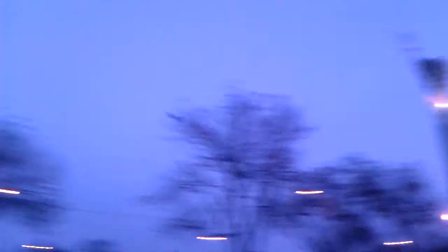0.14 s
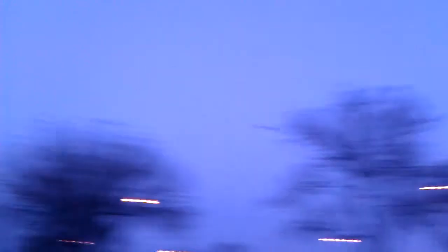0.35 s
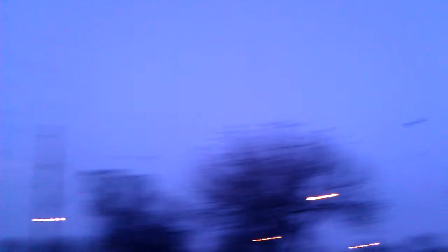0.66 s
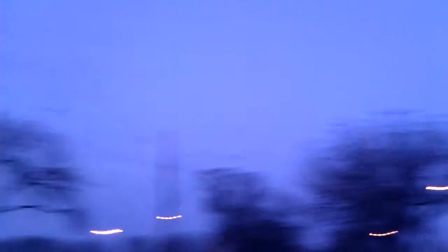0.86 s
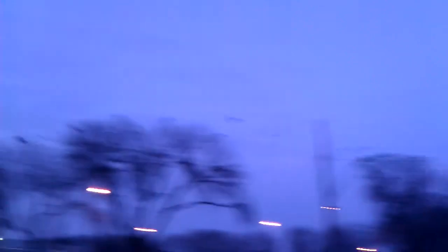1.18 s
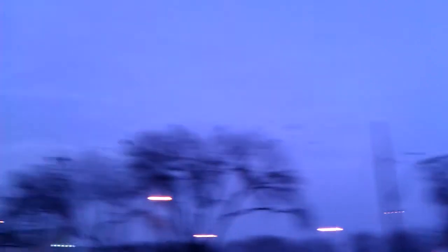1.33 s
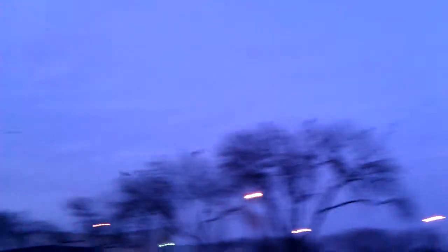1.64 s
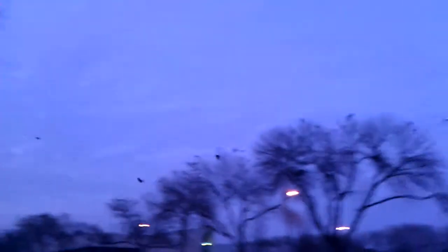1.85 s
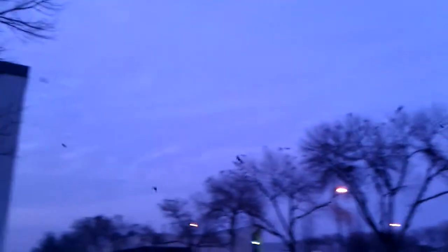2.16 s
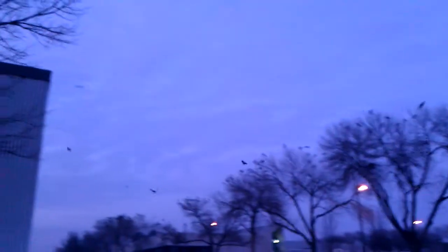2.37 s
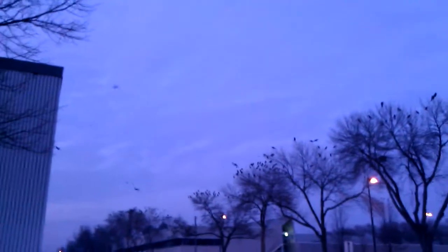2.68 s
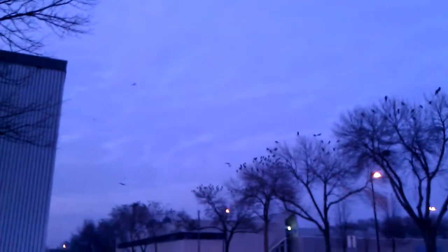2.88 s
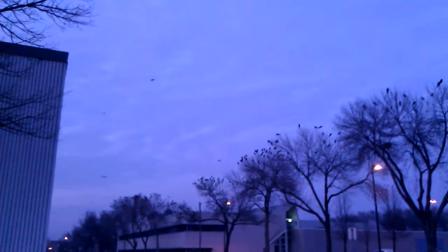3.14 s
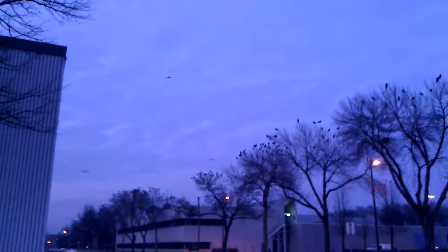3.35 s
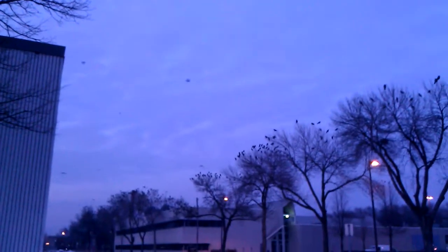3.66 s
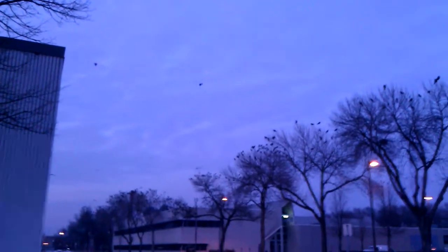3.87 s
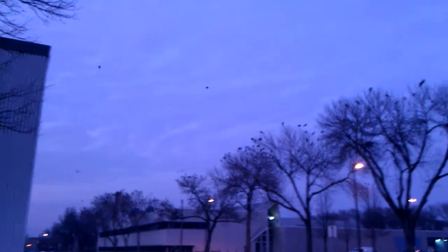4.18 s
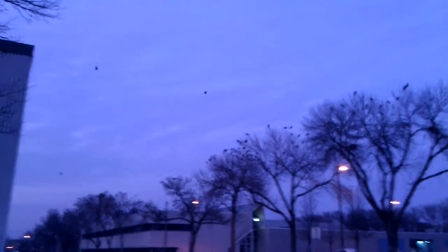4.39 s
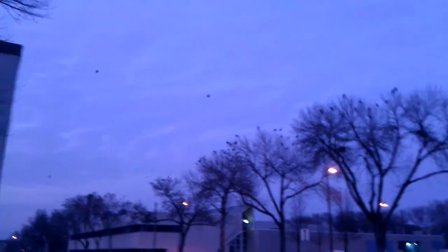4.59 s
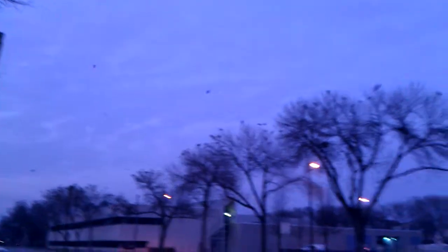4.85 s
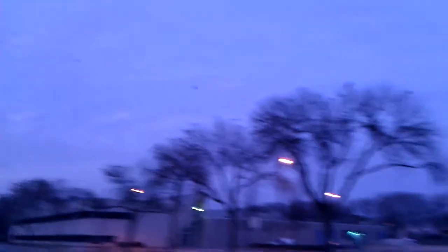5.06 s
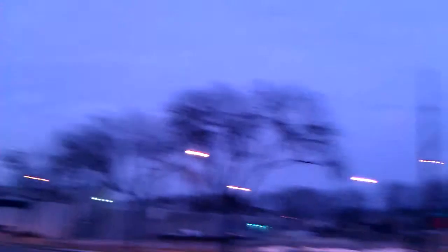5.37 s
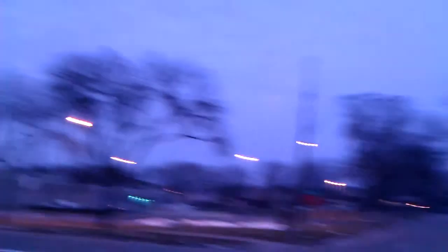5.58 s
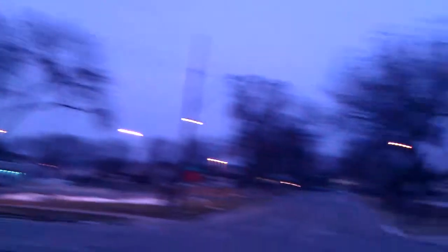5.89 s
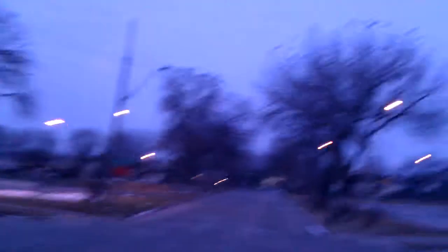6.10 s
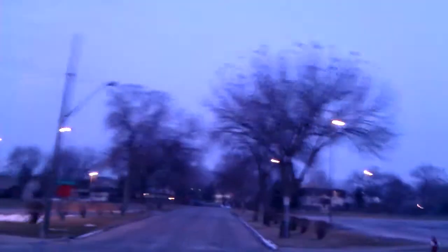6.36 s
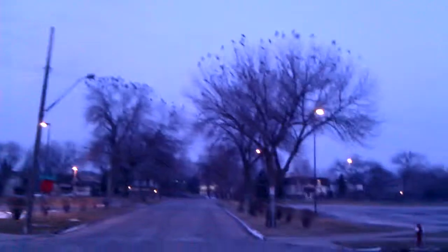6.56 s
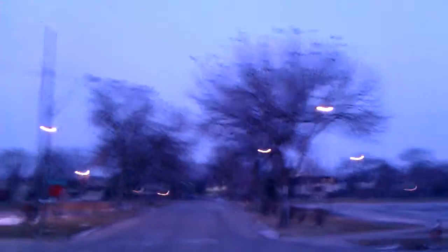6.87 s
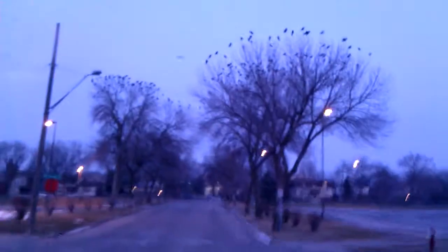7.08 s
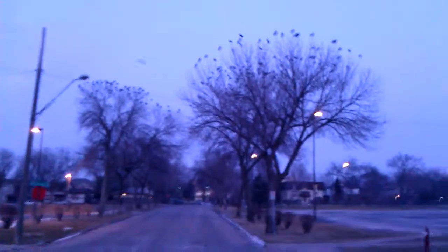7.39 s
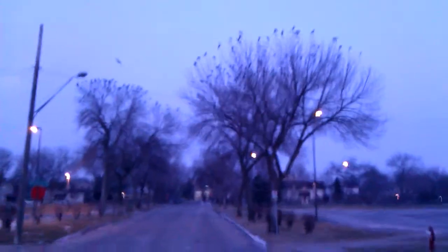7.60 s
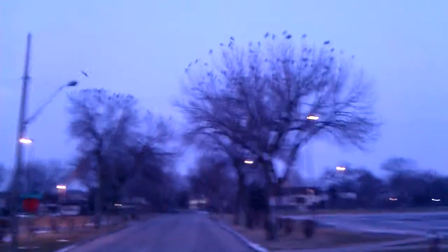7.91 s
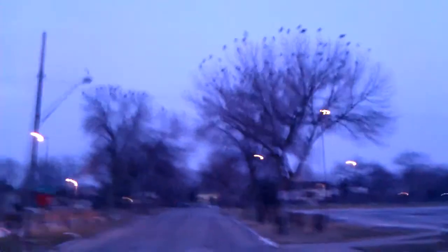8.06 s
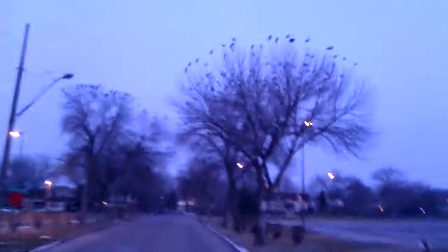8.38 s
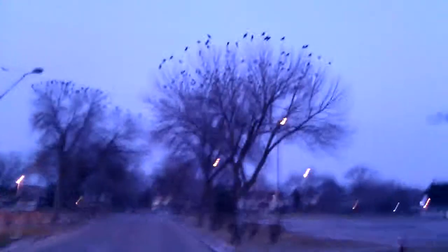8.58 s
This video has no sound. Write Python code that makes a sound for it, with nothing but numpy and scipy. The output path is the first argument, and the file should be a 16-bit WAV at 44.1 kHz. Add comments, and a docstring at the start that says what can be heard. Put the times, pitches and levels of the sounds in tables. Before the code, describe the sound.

A mono, slightly dull hand-held pickup outdoors beside a street at dusk, about 8.7 seconds. From the start, a large crow flock caws loudly: short, hoarse, arched calls of about a tenth of a second, overlapping several per second, over a blurred din of far birds, with short echoes from walls and trunks. Sharp knocks on the camera land near 0.4 and 1.8 s, with softer thuds between. From about 1.5 to 5 s the cawing is quieter and steadier, with thin high sagging whistles hidden in it. Hard knocks return at 5.3 and 5.6 s as near calls briefly thin out. After 6 s caws come in uneven clusters amid grip rumble, finger rustle, plastic creaks and ticks, with a sharp knock near 6.9 s and crackling slips around 8.2 s. Nearby caws strengthen again toward the end. A soft low traffic wash and air hiss continue throughout.

```python
"""Crow roost over a street at dusk

A big flock of crows gathers in bare trees. The nearest birds caw over one another: stacks of jittering
harmonics with air rush, rasp and rattle. Farther off, scores of caws blur into the din of the roost.
Walls, ground and trunks echo the calls; thin sagging tones whistle; shaped noise is the distant traffic.
Close to the microphone, the hand-held camera knocks, rumbles, rustles and creaks: pushes ring its modes."""
import sys
import numpy as np
from scipy import signal
from scipy.fft import rfft, irfft, next_fast_len
from scipy.io import wavfile
from scipy.ndimage import uniform_filter1d

SR = 44100
rng = np.random.default_rng(int(sys.argv[2]) if len(sys.argv) > 2 else 0)


def to_wav(s):
    """Save 16-bit WAV."""
    ch = np.atleast_2d(s).T  # columns
    pcm = np.round(np.clip(ch, -1, 1) * 32767)  # PCM
    wavfile.write(sys.argv[1], SR, pcm.astype(np.int16))


N = 385434  # length in samples

# near birds: gain, and their echoes against the direct sound
CAW_DB, CAW_WET_DB = 2.5, -9
# of a fully rough caw: pitch wander and air rush as shares of pitch and tone; lines between the harmonics
JITTER, NOISE_SHARE, HALF_LINES = 0.038, 0.71, 0.45
# the region that a wide-open beak brightens: centre, and width as a share of it
OPEN_HZ, OPEN_WIDTH = 2150, 0.36
HOARSE_HZ = 1900  # overtones above this break up into a rattle
STREET_T60_S = 0.61

ROOST_DB = -8  # gain on the far din's own level
# the roost answers the near birds: level against theirs, and the time over which it swells and sinks
ANSWER_DB, ANSWER_S = -13, 0.16
# the din's overtones: their level when the din is at the reference, share of its swing in dB they follow
OVERTONE_DB, DIN_REFERENCE_DB, OVERTONE_FOLLOWS = -57.5, -45, 1

# gains on the handling tables and on the traffic
KNOCK_DB, SLIP_DB, RUMBLE_DB, RUSTLE_DB, TOWN_DB = 0.5, -1, -3.5, -2, 1
# the grip holds the case still below this pitch: firm at first, slack once the camera has been swung round
FIRM_HZ, SLACK_HZ, SLACK_FROM_S = 304, 193, 6.19
# a contact harder than NAIL_HZ is a fingernail, too brief to rock the case even in a slack grip;
# NAIL_DB sets its sharp click against the peak in the table of knocks
NAIL_HZ, NAIL_DB = 3800, -8.5
# light bumps of the palm: rate, peak above the rumble table, spread, hardness
BUMPS_PER_S, BUMP_DB, BUMP_SPREAD_DB, BUMP_HARDNESS_HZ = 3.9, 9.5, 3.5, 220
# faint slips while the fingers rustle: rate, peak above the rustle table, spread
FAINT_SLIPS_PER_S, FAINT_SLIP_DB, FAINT_SPREAD_DB = 6.3, 8.5, 2
SLIP_S = 0.0021  # time constant of a slip's burst
DRAG_RUSTLE_DB = -19  # rustle of a dragging palm against its rumble
CUTOFF_HZ = 8300  # top of the recorder's band

# modes of the camera's case [f/Hz, level/dB, t60/s]
CASE_MODES = [(221, -22, 0.012), (315, -8.5, 0.025), (480, -11, 0.018), (782, 5, 0.0091), (1010, 4, 0.0027),
              (3200, -6, 0.00092)]
# what slipping fingers ring with [f/Hz, level/dB, t60/s]
SLIP_RINGING = [(1920, 4.5, 0.0076), (2710, 12.5, 0.0028), (3510, 6, 0.0062), (4670, -27.5, 0.0024),
                (6960, -4.5, 0.002)]
# rumble of the shifting grip, before its gain [t/s, level/dB]
GRIP_RUMBLE = [(0.0, -54.5), (0.78, -54), (1.14, -56), (1.95, -52.5), (2.36, -56), (5.11, -54.5),
               (5.26, -49.5), (5.74, -53.5), (6.57, -47), (7.74, -48), (7.96, -45.5), (8.74, -49.5)]
# rustle of the fingers in the slack grip, before its gain [t/s, level/dB]
FINGER_RUSTLE = [(6.1, -63), (6.25, -66), (6.6, -62), (7.43, -50), (7.66, -56), (8.01, -53.5),
                 (8.16, -47.5), (8.59, -52), (8.74, -45)]


def near_crows():
    """The birds in the closest trees, each in the voice of the group that leads, with their echoes."""
    # near caws, before their gain [t/s, length/s, top f/Hz, level/dB,
    # share of the length at which the pitch tops, brightness from the open beak/dB]
    calls = [(-.09, 0.14, 751, -40.5, 0.43, 5), (0.06, 0.083, 663, -45.5, .5, -8),
             (0.123, 0.1, 712, -41.5, 0.35, -2.5), (0.199, .12, 633.6, -40.5, 0.46, -3),
             (0.299, 0.12, 701, -37, 0.26, 7.5), (0.306, 0.025, 660, -33, 0.48, -3),
             (0.335, 0.011, 687, -37, 0.36, -3), (0.361, 0.044, 659, -38, 0.25, 0),
             (0.449, 0.11, 635, -39.5, .5, 5.5), (0.486, 0.099, 721, -42, 0.59, 2),
             (0.569, 0.14, 614, -47, 0.49, 0), (0.656, 0.094, 709, -40, .35, 8.5),
             (0.798, 0.19, 706.4, -40.5, 0.2, 5), (.858, 0.12, 670.4, -38.5, 0.21, -8),
             (.98, 0.079, 623, -40, 0.49, 0), (1.003, 0.22, 701, -44, 0.43, 8.5),
             (1.07, 0.086, 628, -38.5, .35, -4), (1.139, .13, 654, -46, 0.34, 9),
             (1.229, 0.12, 698, -46.5, 0.41, -1.5), (1.421, .14, 691, -43.5, 0.37, -2),
             (1.52, 0.13, 623, -44, .45, -2.5), (1.581, 0.12, 688, -43, 0.47, -1),
             (1.633, .045, 664, -42.5, 0.38, -5), (1.66, 0.1, 603, -45, 0.22, 3),
             (1.764, 0.15, 679, -46, .37, 3), (1.947, 0.11, 721, -48.5, .37, -8),
             (2.109, .14, 680, -44, 0.42, -3.5), (2.216, 0.14, 689, -44.5, 0.54, -1),
             (2.335, .14, 658, -45.5, 0.35, -0.5), (2.663, 0.17, 654, -48.5, 0.52, -1),
             (2.726, .14, 696, -43.5, .42, -2), (2.811, 0.16, 628, -45.5, 0.39, 2.5),
             (2.924, .13, 624, -44.5, .3, -1.5), (3.145, 0.098, 716, -47.5, 0.41, 2.5),
             (3.234, .11, 756, -47, .47, -3), (3.292, .07, 654, -49.5, 0.33, 1),
             (3.43, 0.028, 634, -41, 0.72, -9), (3.46, 0.14, 650, -43.5, 0.18, -4),
             (3.499, 0.15, 604, -51.5, .25, 4), (3.675, 0.13, 763, -45, 0.48, -5),
             (3.753, 0.078, 658, -52, 0.38, 3), (3.84, 0.16, 756, -50, 0.44, 8),
             (3.882, .11, 655, -53.5, 0.34, 3), (4.025, 0.1, 737, -47.5, 0.27, 1),
             (4.102, 0.16, 642, -51, 0.24, -1), (4.14, .11, 736, -54, .4, 1),
             (4.242, 0.14, 756, -45.5, .42, -0.5), (4.282, 0.1, 667, -51.5, .35, 0),
             (4.485, 0.14, 758, -47, 0.44, -3), (4.556, .13, 672, -47.5, 0.37, 1),
             (4.608, 0.11, 752, -49, 0.38, -7), (4.733, 0.12, 764, -49, 0.39, 3.5),
             (4.788, .12, 661, -53.5, 0.32, 1), (4.9, 0.12, 768, -49, .45, 0),
             (5.005, .12, 765, -48, 0.44, 0), (5.029, .11, 683, -51, .45, -4),
             (5.218, .14, 768, -47, 0.41, -3), (5.314, 0.083, 670, -48, 0.31, 4),
             (5.772, .14, 689, -53.5, .37, 8.5), (5.809, .14, 643, -57.5, 0.31, 12),
             (6.072, 0.14, 702, -50.5, .5, 1), (6.139, .12, 686, -45.5, 0.41, 9),
             (6.178, 0.17, 644, -46.5, 0.48, 4.5), (6.247, 0.13, 709, -46.5, 0.34, -0.5),
             (6.289, 0.13, 631, -49.5, 0.27, 6), (6.34, 0.15, 590, -52, 0.22, 5),
             (6.4, 0.12, 701, -53.5, .4, 7), (6.6, .14, 644, -50, 0.36, 1),
             (6.591, 0.11, 719, -47.5, 0.41, 9.5), (6.68, 0.11, 590, -61, 0.46, 8),
             (6.728, 0.17, 713, -50, .3, 1), (7.142, 0.16, 631, -52.5, 0.49, -1),
             (7.19, 0.092, 726, -45, 0.49, 5), (7.249, 0.14, 750, -47.5, 0.4, -3),
             (7.27, 0.11, 623, -49, 0.38, 12), (7.51, 0.12, 604, -46.5, 0.37, 1),
             (7.653, 0.1, 647, -50, 0.44, 6), (7.772, 0.15, 685.4, -44.5, 0.36, 2.5),
             (7.86, 0.095, 597, -45, 0.31, -8), (8.143, 0.14, 696, -47.5, 0.46, 5),
             (8.166, 0.097, 626, -40.5, 0.45, -9), (8.25, .1, 612.5, -42, .35, 3.5),
             (8.325, 0.14, 592, -52, 0.31, 16), (8.532, .19, 686, -46.5, 0.38, 8),
             (8.568, 0.056, 652, -43.5, 0.46, 1), (8.652, .12, 634.5, -44.5, 0.39, 4)]
    # a crow's throat [f/Hz, level/dB]
    throat = [(400, -23), (700, -7.5), (950, -16.5), (1170, 7.5), (1500, 6.5), (1750, -16.5), (2150, -10),
              (2450, -19), (2750, -21), (3150, -23), (3550, -21.5), (4150, -33.5), (4580, -18.5),
              (4850, -31), (5600, -49), (6700, -33.5), (8000, -53)]
    # voices of the groups [from t/s, roughness 0-1, clearness of the overtones 0-1,
    # beak resonance f/Hz, its level/dB, its width as a share of its pitch]
    voices = [(-1, 0.59, 0.83, 3780, 9.5, 0.096), (0.5, .52, .86, 3520, 4, .035),
              (0, .55, .84, 2900, 4, 0.055), (.97, .55, .88, 3200, 10, .03),
              (0.2, 0.5, .8, 2790, 10, 0.052), (2.0, .58, 0.75, 2960, 13, 0.17),
              (4, 0.45, 0.8, 3250, 12, 0.078), (4.5, 0.3, .92, 3730, 14.5, 0.058),
              (5.5, 0.51, 0.7, 2400, 3.5, 0.14), (6.55, 0.34, 0.92, 2080, 6, 0.087),
              (7.5, 0.41, 0.88, 1750, 4, 0.12)]
    out = np.zeros(N)
    for start_s, length_s, top_hz, db, crest, open_db in calls:
        # the last listed voice whose time has come leads
        _, rough, clear, beak_hz, beak_db, width = [voice for voice in voices if voice[0] <= start_s][-1]
        call = caw(length_s, top_hz, rough, clear, crest, throat, beak_hz, beak_db, open_db, beak_width=width)
        add(out, start_s, from_db(db) * call)
    return from_db(CAW_DB) * (out + from_db(CAW_WET_DB) * street(out))


def caw(length_s, top_hz, rough, clear, crest, throat, beak_hz, beak_db, open_db=0,
        rasp_hz=78, rasp_depth=0.62, beak_width=0.2, count=8):
    """An arched stack of jittering harmonics, shaped by throat and beak; the high ones turn hoarse."""
    # the arch of one caw [share of its length, share of its top pitch, loudness 0-1]
    arch = [(0, .74, 0), (.08, .83, .75), (.22, .935, 1), (.34, .987, 1), (.45, 1, 1), (.62, .968, 1),
            (.85, .875, .9), (1, .79, 0)]
    size = int(length_s * SR)
    share, pitch, loudness = np.transpose(arch)
    u = np.linspace(0, 1, size)

    # the beak lifts one region of the overtones; opened wide, it also brightens a second one
    f = np.geomspace(200, 9000, 120)
    beak_lift_db = beak_db * np.exp(-(np.log(f / beak_hz) / beak_width) ** 2)
    open_lift_db = open_db * np.exp(-(np.log(f / OPEN_HZ) / OPEN_WIDTH) ** 4)
    tract_db = 20 * np.log10(gain_at(throat, f)) + beak_lift_db + open_lift_db
    tract = np.transpose([f, tract_db])

    # an early crest makes a falling caw, a late one a rising one
    along = np.interp(u, [0, np.clip(crest, .05, .9), 1], [0, share[pitch.argmax()], 1])
    hz = top_hz * np.interp(along, share, pitch)
    jittered_hz = hz * (1 + JITTER * rough * wobble(size, 697.7))
    phase = 2 * np.pi * np.cumsum(jittered_hz) / SR

    # paths through the branches make each harmonic swell and fade on its own
    def partial(k):
        level = gain_at(tract, k * hz) * from_db(3.3 * wobble(size, 30.9))
        return level * np.sin(k * phase + rng.uniform(0, 2 * np.pi))

    # strong and weak cycles alternate, which puts half lines between the harmonics
    harmonics = [partial(k) + HALF_LINES * rough * partial(k + .5) for k in range(1, count + 1)]
    tone = rms_one(sum(harmonics))
    # air rushes through once a cycle
    once_a_cycle = 1 + np.cos(phase)
    rush = coloured(rng.standard_normal(size) * once_a_cycle, tract)
    # the two sides of the syrinx beat unevenly against each other: the rasp
    beat_hz = rasp_hz * (rng.uniform(0.6994, 1.3) + 0.289 * wobble(size, 89.5))
    rasp = np.exp(rasp_depth * rough * np.sin(2 * np.pi * np.cumsum(beat_hz) / SR))
    # uneven cycles smear part of the high harmonics into a rattle that only throat and beak shape
    rattle = coloured(rng.standard_normal(size) * once_a_cycle * rasp, tract)
    clear = np.clip(clear, 0, 1)
    overtones = clear * tone + np.sqrt(1 - clear ** 2) * rattle
    voice = cut(tone, HOARSE_HZ, "low", order=4) + cut(overtones, HOARSE_HZ, "high", order=4)
    return rms_one((voice + NOISE_SHARE * rough * rush) * rasp) * np.interp(u, share, loudness)


def street(x, first_s=.025, count=280):
    """Scattered echoes from walls, ground and trunks, fading with delay and duller than the direct sound."""
    delays = rng.uniform(first_s, .8, count)
    echoes = np.zeros(SR)
    echoes[(delays * SR).astype(int)] = rng.standard_normal(count) * from_db(-60 * delays / STREET_T60_S)
    unit_energy = echoes / np.linalg.norm(echoes)
    return cut(signal.fftconvolve(x, unit_energy)[:N], 4500, "low")


def roost(near, pitch_hz=675, pitch_spread=.075, rough=0.54, clear=0.66, crest=0.4005,
          beak_hz=2900, beak_db=2, split_hz=1900, count=96):
    """Scores of far caws blur into a din that swells whenever the near birds call."""
    # the din's own level, before its gain [t/s, level/dB]
    own_level = [(0.0, -33), (0.92, -33.5), (1.35, -37.5), (1.7, -42.5), (2.08, -46), (2.2, -41.5),
                 (2.6, -43.5), (2.82, -40.5), (3.6, -41.5), (4.23, -45), (4.44, -58), (4.66, -41),
                 (5.67, -49), (6.28, -44), (6.47, -49.5), (6.86, -40), (7.01, -47), (7.76, -44.5),
                 (7.98, -59), (8.64, -43.5)]
    # far caws after their way through the air [f/Hz, level/dB]
    far_throat = [(400, -31.5), (700, -12.5), (950, -13.5), (1180, 1), (1480, 0), (1670, -2.5), (1850, -17),
                  (2300, -23.5), (3300, -12), (4300, -21.5), (6000, -30.5), (8000, -41)]
    out = np.zeros(N)
    for k in range(count):
        start_s = (k + rng.random() - 2) / (count - 2) * N / SR
        top_hz = pitch_hz * np.exp(pitch_spread * rng.standard_normal())
        length_s, far_beak_hz = rng.uniform(.16, .25), beak_hz * rng.uniform(0.62, 1.0)
        add(out, start_s, caw(length_s, top_hz, rough, clear, crest, far_throat, far_beak_hz, beak_db, count=5))
    din = out + 0.59 * street(out)
    # even out the chance swells, then lay on the level
    din = din / np.sqrt(uniform_filter1d(din ** 2, size=6000) + 1e-9)
    own_db, = in_time(own_level)
    answer_power = uniform_filter1d((from_db(ANSWER_DB) * near) ** 2, size=int(ANSWER_S * SR))
    level_db = 10 * np.log10(from_db(own_db + ROOST_DB) ** 2 + answer_power)
    overtones_db = OVERTONE_DB + OVERTONE_FOLLOWS * (level_db - DIN_REFERENCE_DB)
    body = from_db(level_db) * rms_one(cut(din, split_hz, "low", order=4))
    return body + from_db(overtones_db) * rms_one(cut(din, split_hz, "high", order=4))


def whistles(quaver=0.0093, wet_db=-6):
    """Thin, high, nearly pure notes among the crows that sag in pitch, with their echoes."""
    # whistled notes [t/s, length/s, f/Hz, fall as a share of the pitch, level/dB]
    notes = [(.96, 0.18, 3530, 0.011, -57.5), (3.3, 0.038, 3700, 0.054, -63),
             (3.375, 0.048, 3740, 0.05, -59), (3.74, 0.032, 3730, 0.045, -61),
             (3.826, 0.039, 3750, 0.072, -55.5), (5.238, .2, 3800, .005, -71),
             (5.581, 0.12, 3770, 0.0049, -65), (6.61, 0.15, 3610, .02, -66), (7.07, 0.16, 3710, 0.035, -61),
             (7.182, 0.2, 3680, 0.03, -62)]
    out = np.zeros(N)
    for start_s, length_s, hz, fall, db in notes:
        u = np.linspace(0, 1, int(length_s * SR))
        sagging_hz = hz * (1 - fall * u + quaver * wobble(len(u), 370))
        phase = 2 * np.pi * np.cumsum(sagging_hz) / SR
        add(out, start_s, from_db(db) * np.sqrt(2) * np.sin(np.pi * u) * np.sin(phase))
    return out + from_db(wet_db) * street(out)


def knocks(spot_db=4, detune=0.084):
    """Each knock rings the case a little differently; a soft finger pad leaves only the low thud."""
    # knocks of the hand on the camera, before their gain [t/s, peak level/dB, hardness of the contact f/Hz]
    hits = [(.32, -19.5, 503), (0.423, -9.5, 4950), (.4295, -14, 395), (0.5176, -24, 201),
            (0.5361, -16, 2000), (0.7337, -21, 400), (.9425, -26, 504), (1.465, -26.5, 250),
            (1.7524, -20.5, 394), (1.784, -10.5, 4970), (1.88, -38, 246), (1.923, -36, 250),
            (1.937, -39, 250), (2.065, -36, 200), (2.545, -39, 250), (2.8803, -27.5, 195),
            (2.9596, -24.5, 250), (3.078, -30.5, 350), (3.3125, -26, 249), (3.456, -25, 300),
            (4.164, -31.5, 300), (5.079, -22, 387), (5.128, -27, 2000), (5.144, -27, 2020),
            (5.2815, -27, 199), (5.34, -9.5, 5070), (5.515, -27, 250), (5.64, -10.5, 387),
            (5.9787, -23, 1000), (6.109, -19.5, 400), (6.1805, -24.5, 450), (6.2027, -17, 800),
            (6.406, -29.5, 2000), (6.4568, -31, 500), (6.538, -26.5, 256), (6.7492, -22, 1390),
            (6.7876, -28, 1500), (6.807, -24.5, 250), (6.9355, -12, 4730), (6.995, -25, 5000),
            (7.008, -16, 900), (7.0157, -22, 204), (7.533, -32, 302), (7.612, -34, 250),
            (7.695, -35.5, 250), (8.151, -28, 250), (8.16, -24, 1220), (8.2275, -20.5, 5000),
            (8.2378, -22, 3000), (8.268, -26.5, 500), (8.334, -19, 4500), (8.37, -30, 400),
            (8.461, -32.5, 253), (8.685, -27, 199)]
    # what a fingernail's click rings with [f/Hz, level/dB, t60/s]
    nail_modes = [(2180, -7, 0.0028), (3330, -1, 0.004)]
    out = np.zeros(N)
    bump_times = scattered(GRIP_RUMBLE, BUMPS_PER_S, BUMP_DB, BUMP_SPREAD_DB)
    bumps = [(s, db, BUMP_HARDNESS_HZ) for s, db in bump_times]
    for s, db, hardness_hz in list(hits) + bumps:
        held_hz = SLACK_HZ if s > SLACK_FROM_S and hardness_hz < NAIL_HZ else FIRM_HZ
        modes = [(hz * np.exp(detune * rng.standard_normal()), level + spot_db * rng.standard_normal(), t60)
                 for hz, level, t60 in CASE_MODES]
        push = cut(signal.unit_impulse(SR // 20), hardness_hz, "low")
        knock = cut(ring(push, modes), held_hz, "high", order=3)
        add(out, s, from_db(db + KNOCK_DB) * knock / np.abs(knock).max())
        if hardness_hz > NAIL_HZ:
            click = ring(push, nail_modes)
            add(out, s, from_db(db + NAIL_DB) * click / np.abs(click).max())
    return out


def grip(soft_hz=260, low_hz=130, drag_hz=480):
    """Catches rumble through the palm, harder where it drags, and crackle as the fingers rustle when slack."""
    # the palm drags over the case [t/s, length/s, level/dB]
    palm_drags = [(6.141, 0.036, -37.5), (6.324, 0.09, -46.5), (6.449, 0.04, -44), (6.782, 0.024, -34),
                  (6.96, 0.074, -33), (8.202, 0.19, -51)]
    (rumble_db,), (rustle_db,) = in_time(GRIP_RUMBLE), in_time(FINGER_RUSTLE)
    slack = np.arange(N) / SR > FINGER_RUSTLE[0][0]
    palm = cut(ring(catches(per_s=2200, size_db=3, clump_db=2.5), CASE_MODES), low_hz, "high")
    fingers = rms_one(ring(catches(per_s=1000, size_db=4.5, clump_db=3.0), SLIP_RINGING))
    rumble = from_db(rumble_db + RUMBLE_DB) * rms_one(cut(palm, soft_hz, "low"))
    rustle = slack * from_db(rustle_db + RUSTLE_DB) * fingers
    drag = strokes(palm_drags) * (rms_one(cut(palm, drag_hz, "low")) + from_db(DRAG_RUSTLE_DB) * fingers)
    return rumble + rustle + drag


def rubs(detune=0.098):
    """A fingertip creaks across the plastic in uneven runs of catches, each stroke at a pitch of its own."""
    # strokes of the fingertip [t/s, length/s, level/dB]
    rub_strokes = [(6.084, 0.045, -49), (6.306, 0.017, -47.5), (6.81, 0.069, -50), (6.931, 0.049, -45),
                   (7.351, 0.039, -40.5), (7.483, 0.039, -47.5), (7.531, 0.022, -40.5), (7.937, .04, -51),
                   (8.08, 0.059, -49), (8.165, 0.0165, -54), (8.2, 0.026, -56), (8.409, 0.028, -52),
                   (8.568, 0.094, -46.5), (8.691, 0.021, -33.5)]
    # what a rub rings with [f/Hz, level/dB, t60/s]
    rub_modes = [(1750, 0.5, .003), (2690, 25.5, 0.0097), (3000, 3.5, .005), (3750, -8, 0.0043),
                 (4660, -19, 0.0022), (7550, -13, .003)]
    out, force = np.zeros(N), catches(per_s=1100, size_db=4.0, clump_db=4.5)
    for start_s, length_s, db in rub_strokes:
        shift = np.exp(detune * rng.standard_normal())
        run = force[int(start_s * SR):][:int(length_s * SR)]
        creak = rms_one(ring(run, [(hz * shift, level, t60) for hz, level, t60 in rub_modes]))
        add(out, start_s, from_db(db) * creak * np.sin(np.linspace(0, np.pi, len(creak))))
    return out


def slips(detune=0.038):
    """Skin lets go of the plastic in a short noise burst that rings a few high modes."""
    # fingers slip on the case, before their gain [t/s, peak level/dB]
    plain_slips = [(2.325, -34), (3.6107, -36.5), (4.893, -35), (5.6835, -34), (6.107, -45), (6.165, -32.5),
                   (6.852, -35.5), (6.944, -38), (6.9945, -20.5), (7.3638, -44), (7.3725, -42),
                   (7.449, -33), (7.4963, -37), (7.5367, -42), (7.678, -34), (8.0043, -31), (8.093, -41),
                   (8.174, -23.5), (8.218, -23.5), (8.2245, -19), (8.6522, -27), (8.6644, -28),
                   (8.7018, -32), (8.731, -38)]
    out, t = np.zeros(N), np.arange(SR // 20) / SR
    faint = scattered(FINGER_RUSTLE, FAINT_SLIPS_PER_S, FAINT_SLIP_DB, FAINT_SPREAD_DB)
    for s, db in list(plain_slips) + faint:
        modes = [(hz * np.exp(detune * rng.standard_normal()), level, t60) for hz, level, t60 in SLIP_RINGING]
        tick = ring(rng.standard_normal(len(t)) * np.exp(-t / SLIP_S), modes)
        add(out, s, from_db(db + SLIP_DB) * tick / np.abs(tick).max())
    return out


def town(waver_db=1.5):
    """Shaped noise: a wash of far traffic that swells slowly and wavers, with a faint high hiss."""
    # level of the far traffic, before its gain [t/s, level/dB]
    traffic_level = [(0.0, -49.5), (1.51, -50), (5.04, -50.5), (5.33, -50), (5.92, -51.5), (6.33, -50),
                     (7.89, -48.5), (8.25, -46.5), (8.42, -50), (8.74, -46.5)]
    # spectrum of the traffic wash and the high hiss, relative [f/Hz, level/dB]
    town_spectrum = [(30, -35.5), (60, -19), (130, -5), (270, 1.5), (450, 0), (800, 0), (1100, -3.5),
                     (2300, -11.5), (3500, -17), (5000, -26.5), (5800, -42.5), (6800, -28.5), (7700, -23),
                     (8300, -32)]
    level_db, = in_time(traffic_level)
    wash = from_db(level_db + TOWN_DB + waver_db * wobble(N, 4.9))
    return wash * coloured(rng.standard_normal(N), town_spectrum)


def scattered(curve, per_s, above_db, spread_db):
    """Random events (s, dB) over the span of a level curve, spread about a level above it."""
    s, db = np.transpose(curve)
    times = rng.uniform(s[0], s[-1], int(per_s * np.ptp(s)))
    return [(t, np.interp(t, s, db) + above_db + spread_db * rng.standard_normal()) for t in times]


def catches(per_s, size_db, clump_db):
    """Skin catches on plastic: random clicks of uneven size, strong and weak in clumps."""
    sizes = from_db(size_db * np.minimum(rng.exponential(1, N), 4) + clump_db * wobble(N, 90))
    return sizes * rng.choice([-1, 1], N) * (rng.random(N) < per_s / SR)


def strokes(rows):
    """Pressure that swells and sinks once for each (start s, length s, dB)."""
    pressure = np.zeros(N)
    for start_s, length_s, db in rows:
        add(pressure, start_s, from_db(db) * np.sin(np.linspace(0, np.pi, int(length_s * SR))))
    return pressure


def ring(x, modes):
    """Damped modes (Hz, dB, t60 s), all driven by the same force."""
    out = 0
    for hz, db, t60 in modes:
        r, w = from_db(-60 / (t60 * SR)), 2 * np.pi * hz / SR
        out = out + from_db(db) * signal.lfilter([0, np.sin(w)], [1, -2 * r * np.cos(w), r * r], x + 1e-18)
    return out


def from_db(db):
    """Decibels to gain."""
    return 10 ** (np.asarray(db) / 20)


def rms_one(x):
    """Scale to unit rms."""
    return x / np.sqrt(np.mean(x ** 2) + 1e-20)


def in_time(rows):
    """Each column of a curve at every sample."""
    s, *columns = np.transpose(rows)
    return [np.interp(np.arange(N) / SR, s, c) for c in columns]


def gain_at(spectrum, hz):
    """Gain of a (Hz, dB) spectrum on a log-frequency axis."""
    f, db = np.transpose(spectrum)
    return from_db(np.interp(np.log(hz + 1), np.log(f), db))


def coloured(x, spectrum):
    """Filter a sound by a (Hz, dB) spectrum; rms 1."""
    size = next_fast_len(len(x))
    shaped = rfft(x, size) * gain_at(spectrum, np.fft.rfftfreq(size, 1 / SR))
    return rms_one(irfft(shaped, size)[:len(x)])


def cut(x, hz, kind, order=2):
    """Butterworth low- or high-pass."""
    return signal.sosfilt(signal.butter(order, min(hz, .45 * SR), kind, fs=SR, output="sos"), x)


def wobble(size, per_s):
    """Random wandering between per_s fresh values a second, with a spread near 1."""
    steps = np.arange(size) * per_s / SR
    count = int(steps[-1]) + 2
    return np.interp(steps, np.arange(count), rng.standard_normal(count))


def add(track, start_s, sound):
    """Mix a sound in at its time."""
    at = int(round(start_s * SR))
    first, last = max(at, 0), min(at + len(sound), N)
    if last > first:
        track[first:last] += sound[first - at:last - at]


def scene():
    """Crows and town around a hand-held camera, in one channel."""
    near = near_crows()
    birds = near + roost(near) + whistles()
    handling = knocks() + grip() + rubs() + slips()
    return (birds + handling + town())[None, :]


def record(dry):
    """The recorder keeps only the lower treble: a steep elliptic low-pass."""
    return signal.sosfilt(signal.ellip(10, .3, 70, CUTOFF_HZ, fs=SR, output="sos"), dry)


dry = scene()
out = record(dry)
to_wav(out)
```